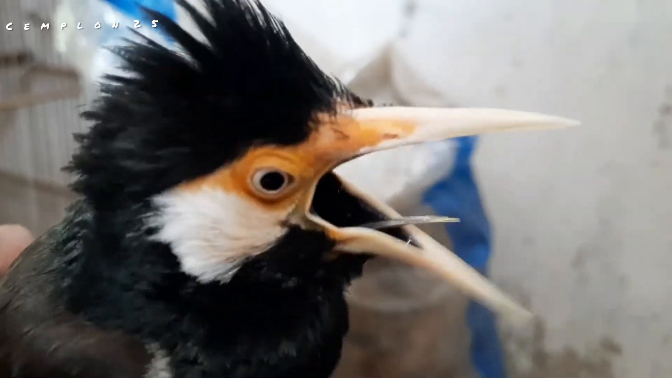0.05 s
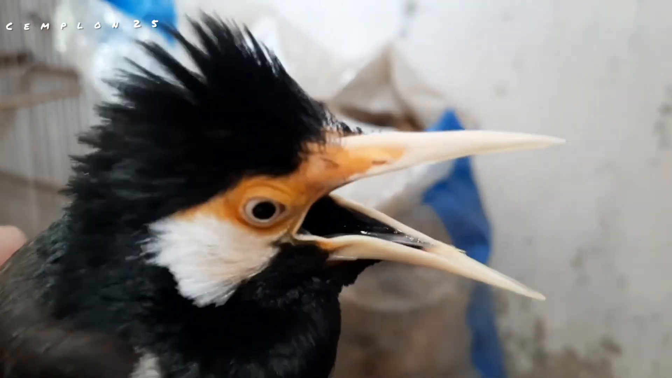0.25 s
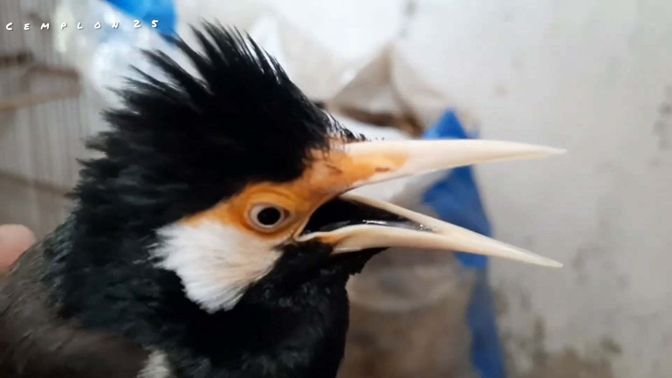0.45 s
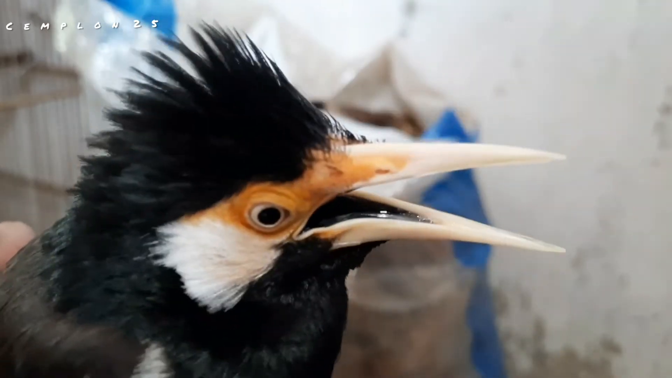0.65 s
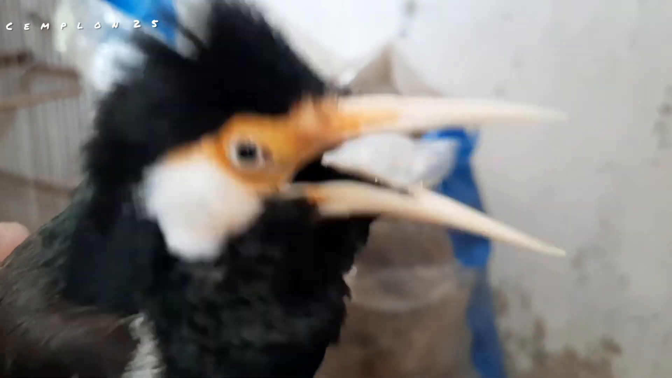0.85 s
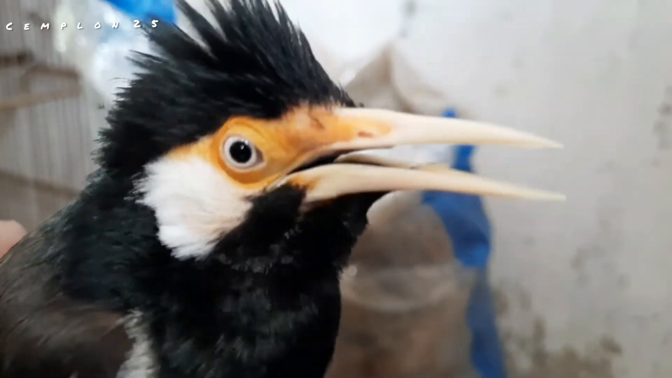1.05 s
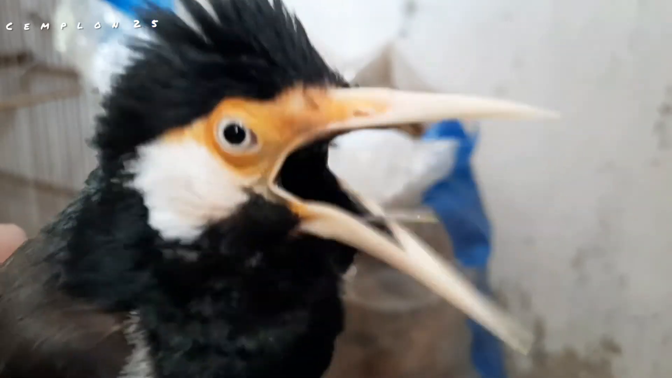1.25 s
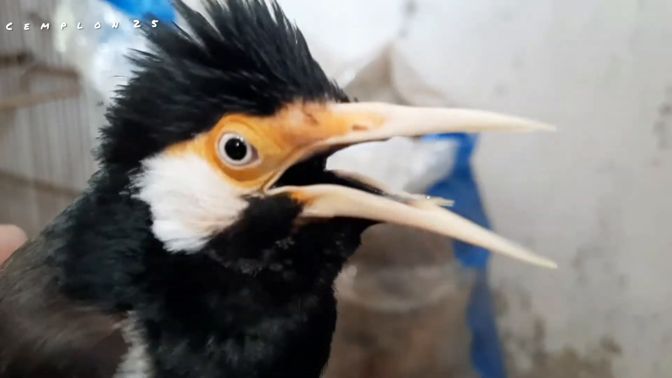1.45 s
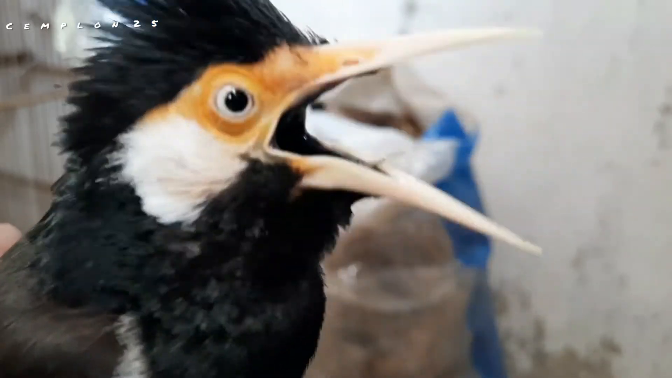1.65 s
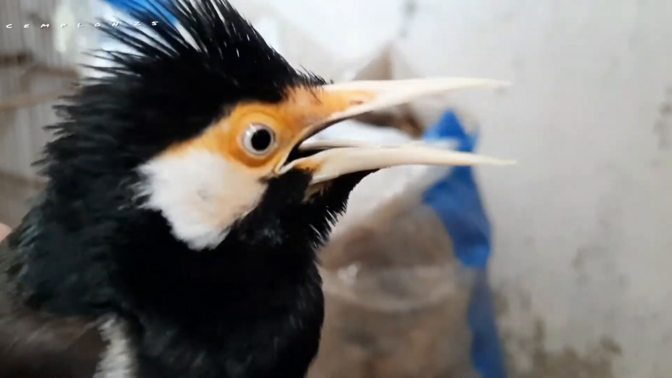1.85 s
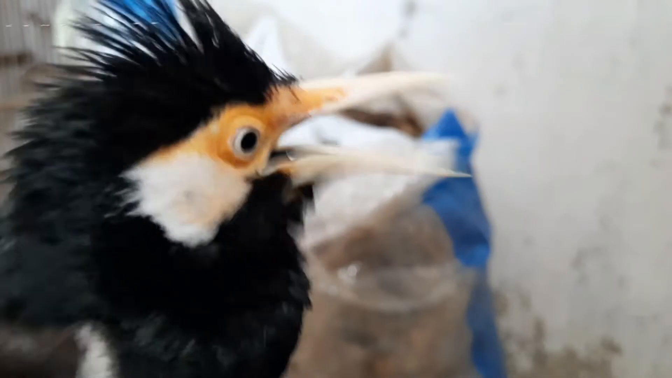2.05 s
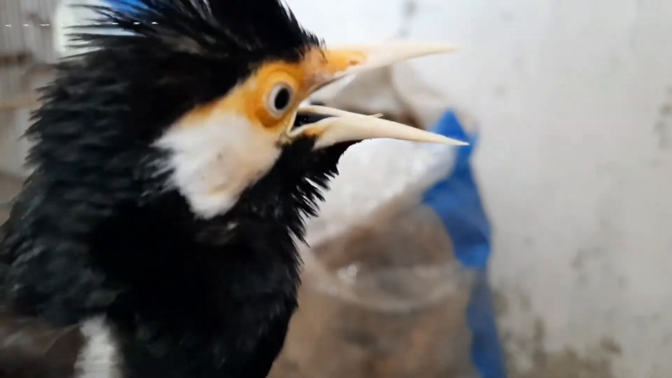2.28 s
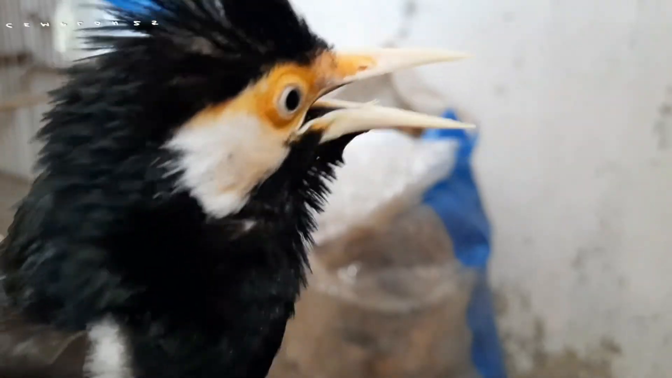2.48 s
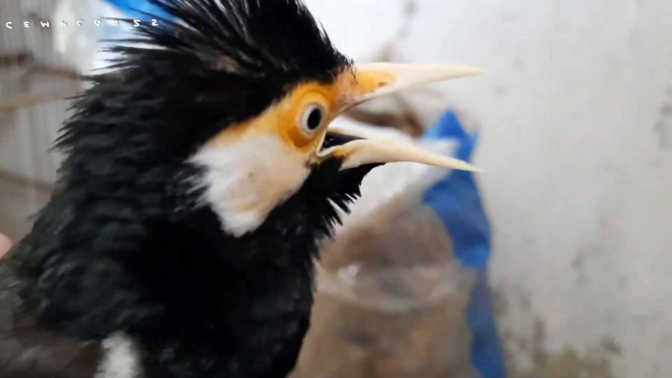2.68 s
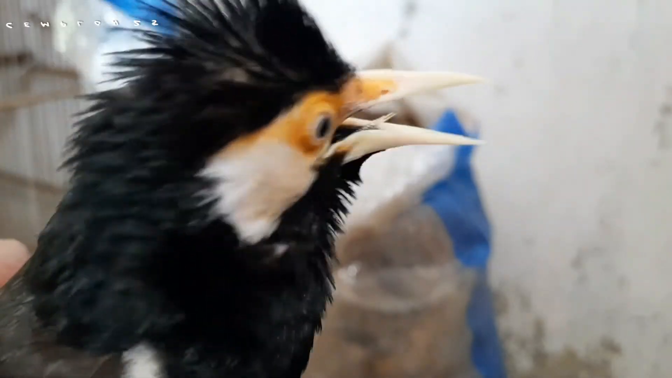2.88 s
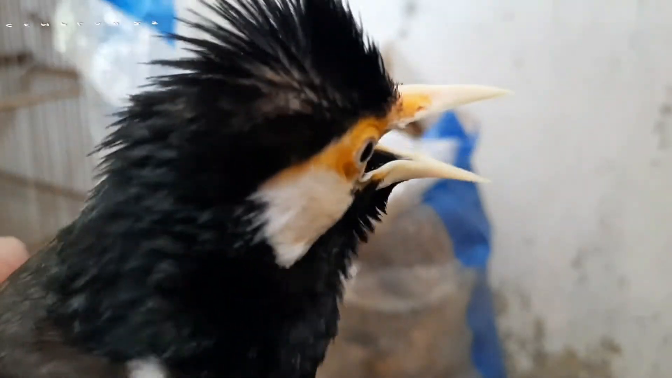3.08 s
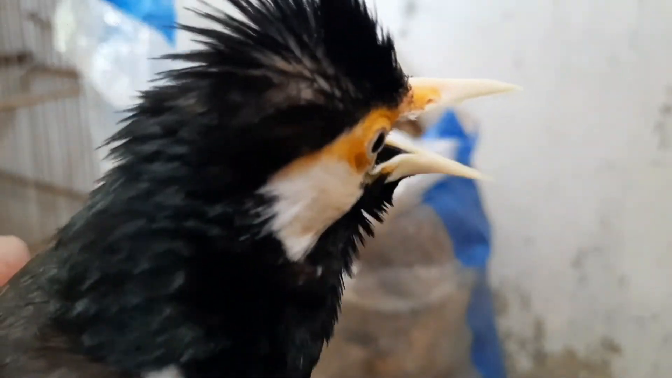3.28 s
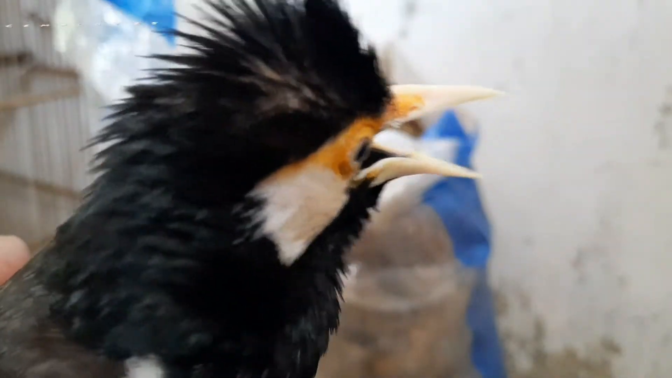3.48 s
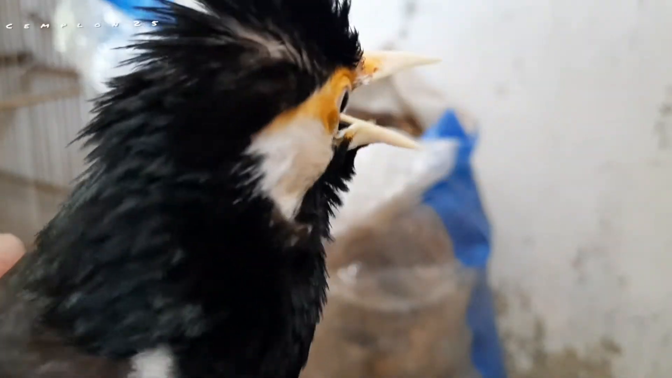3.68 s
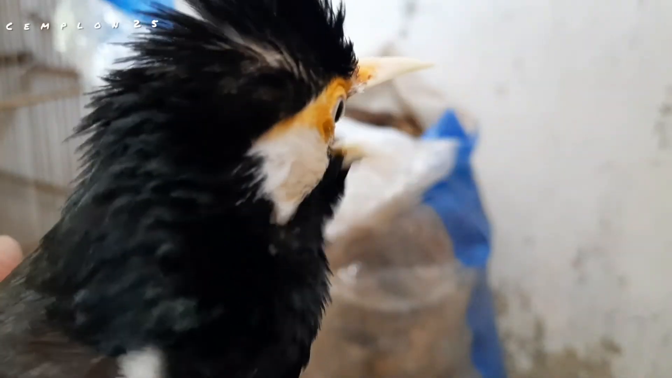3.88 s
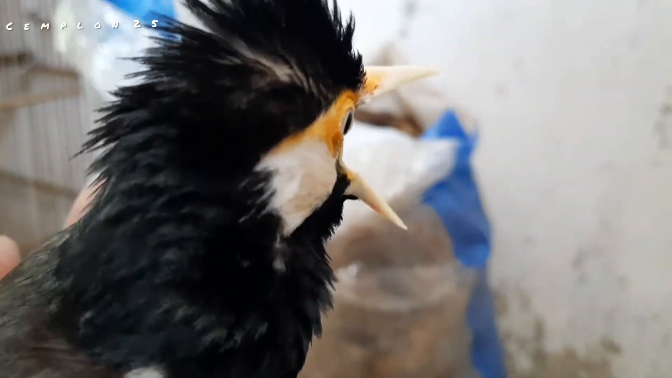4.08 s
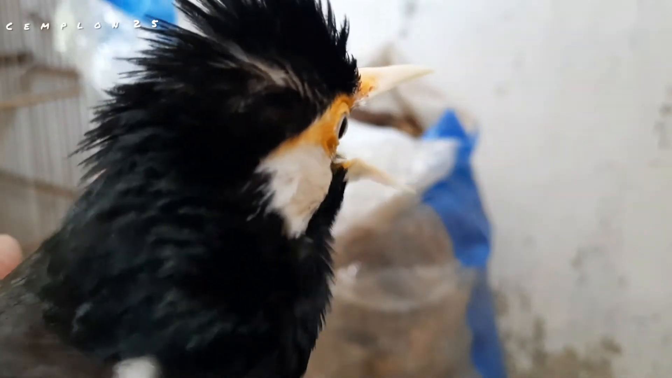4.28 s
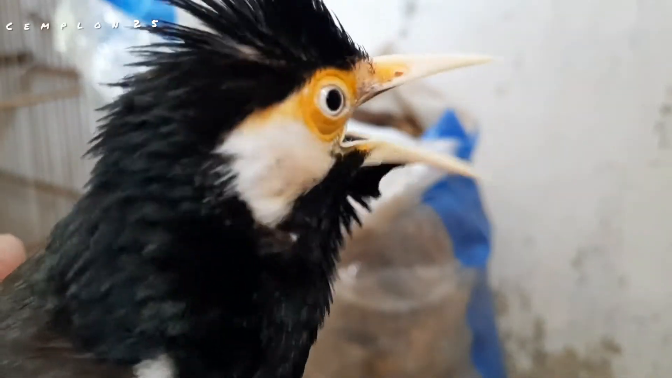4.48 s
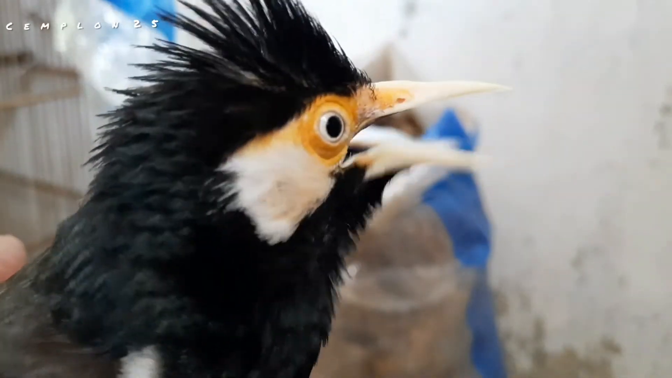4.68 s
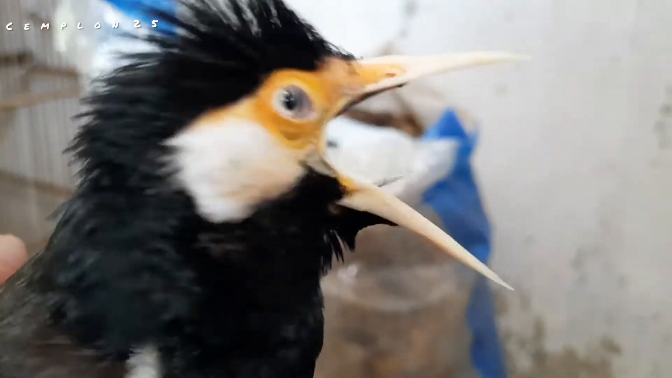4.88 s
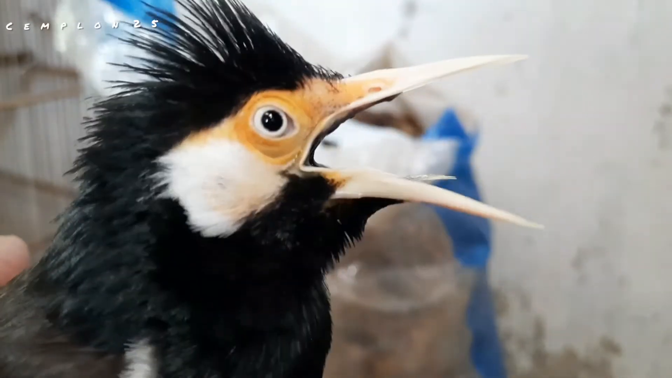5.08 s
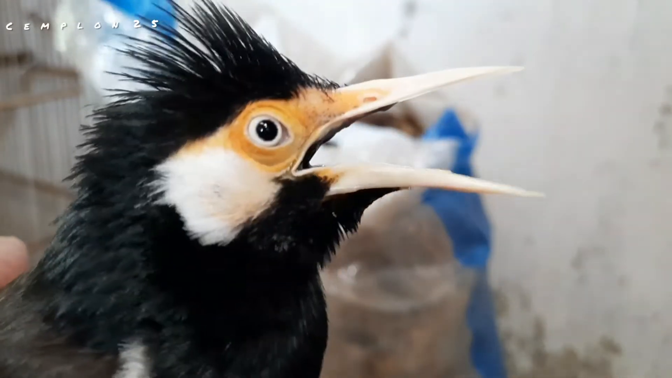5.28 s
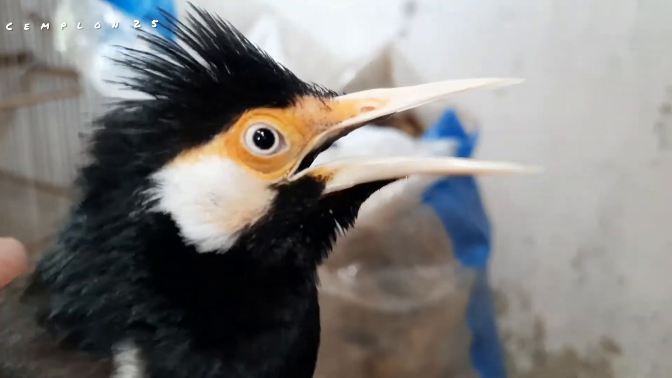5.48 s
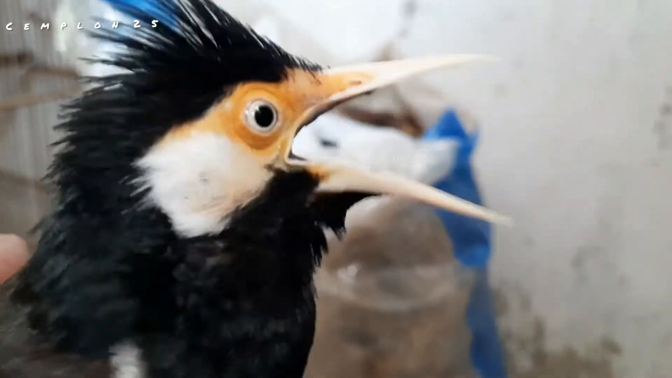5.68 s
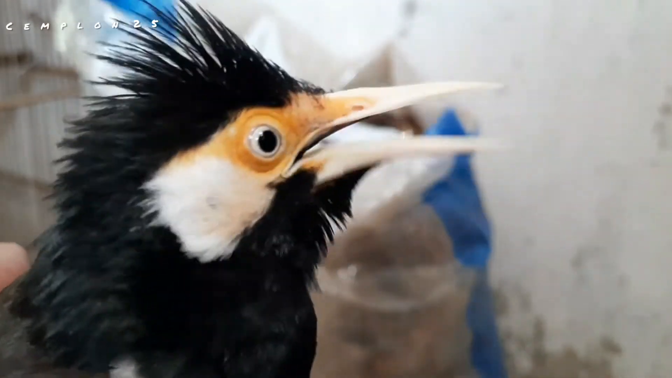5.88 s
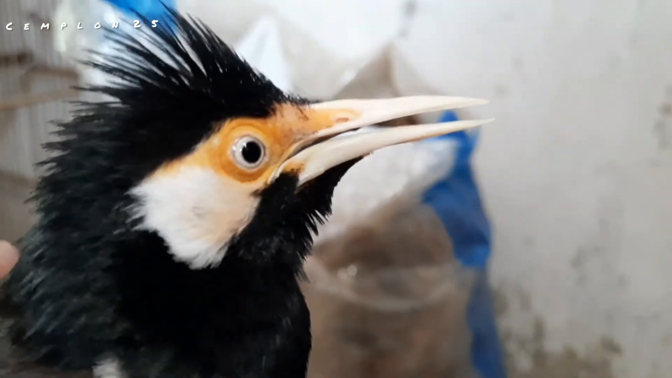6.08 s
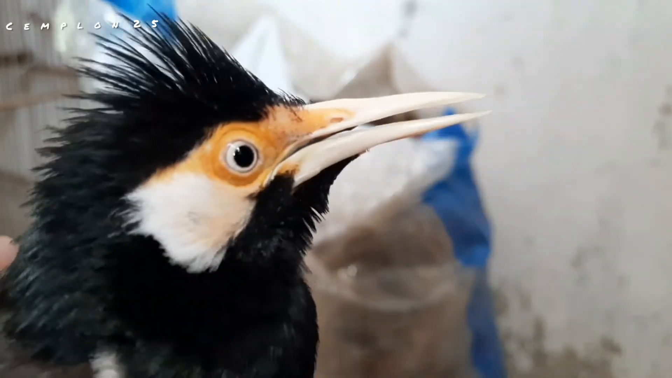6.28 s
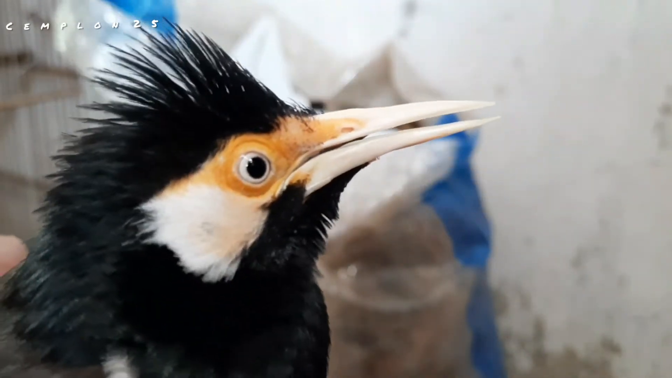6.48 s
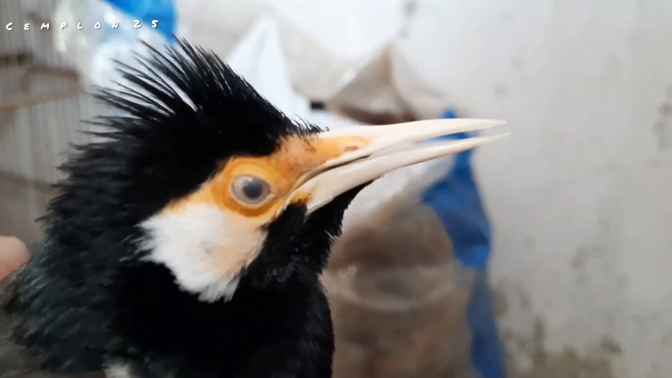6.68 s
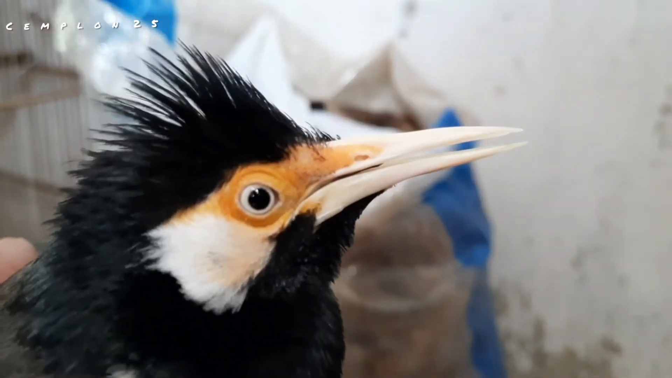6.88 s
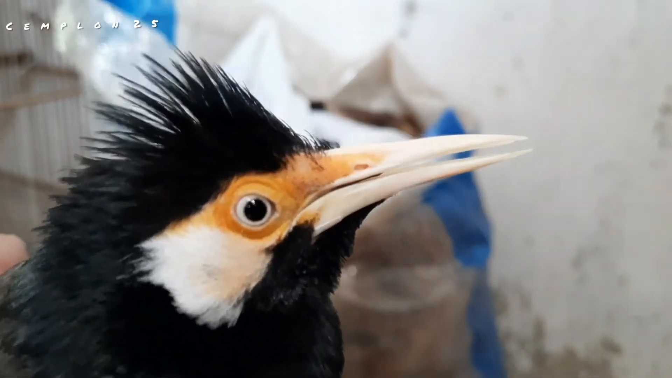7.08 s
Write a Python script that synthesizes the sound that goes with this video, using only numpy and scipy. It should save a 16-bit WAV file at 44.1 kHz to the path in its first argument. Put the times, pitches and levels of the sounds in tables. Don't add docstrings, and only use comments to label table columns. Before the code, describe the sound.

Very close, bright bird song in a small echoing yard: isolated shrill whistles first, then evenly spaced buzzing trills that curl upward, a soft low note and a fast volley of raspy chirps. Fainter caged birds whistle and chatter underneath, mostly in the middle. Song stops, returns for a brief fluttering whistle, then only dry bill snaps, a faint frog-like purr, low traffic and motor hum remain.

```python
import sys
import numpy as np
from scipy import signal
from scipy.fft import rfft, irfft, next_fast_len
from scipy.io import wavfile
from scipy.ndimage import uniform_filter1d, map_coordinates

SR = 44100
rng = np.random.default_rng(int(sys.argv[2]) if len(sys.argv) > 2 else 0)


def elevation(decibels):
    levels = np.asarray(decibels, float)
    return 10 ** (levels / 20)


def unload_audio(sound):
    columns = np.transpose(np.atleast_2d(sound))
    steps = np.round(np.clip(columns, -1, 1) * 32767)
    wavfile.write(sys.argv[1], SR, steps.astype(np.int16))


N = 314874

# frequency in Hz, level in dB.
BEAK = [(1000, -8), (2500, 12.5), (4500, 14.5), (6000, 7.5), (9000, 11), (11500, 8), (14000, 3.5),
        (16000, -2.5)]
# start in seconds, length in seconds, level in dB, first pitch swing in Hz.
TRILLS = [(2.071, 0.17, -13.5, 398), (2.449, 0.17, -10.5, 447.7), (2.856, 0.17, -8.5, 420),
          (3.155, 0.16, -8, 436.6), (3.532, 0.15, -9.5, 440)]
# first rate in Hz, last rate in Hz, start in turns,
# extra loudness at the crest in dB, extra second multiple in dB.
BEAT = [(89.7, 160, 0.22, -2, 9.5), (71.5, 98, 0.3, 0, 8.5), (81.6, 47, 0.017, -1.5, 9.5),
        (74.8, 71, -0.0087, 0, 5), (66, 60, -0.13, -1, 4), (94.9, 80, 0.13, 4, 8.5)]
# start in seconds,
# peak in dB, crack in dB.
SNAPS = [(0.1604, -53.5, -24), (0.4099, -51, -4.5), (0.6586, -43.5, -9), (1.2075, -26, -17.5),
         (2.0578, -19, -22.5), (2.4368, -19, -28), (2.8444, -16.5, -24.5), (3.1463, -17.5, -28),
         (3.5204, -16.5, -30), (6.0253, -27, -8.5), (6.304, -40.5, 3), (7.0699, -31.5, -2.5)]
# start in seconds, hold in seconds, centre in Hz, level in dB,
# gritty edge in dB.
FLOCK = [(.64, 0.2, 3201, -58.5, -68.5), (0.799, 0.23, 3025, -47, -69.5), (1.066, 0.027, 3515, -43.5, -60),
         (1.25, 0.067, 3796, -51.5, -63), (1.49, .07, 3600, -40.5, -60), (1.629, 0.12, 3600, -45.5, -54),
         (1.778, 0.055, 2506, -49, -72), (1.918, .14, 4486, -44.5, -58), (2.071, .16, 4200, -42.5, -59.5),
         (2.248, 0.1, 3680, -36.5, -54.5), (2.374, .14, 3800, -42.5, -55.5),
         (2.727, .1, 3386, -46.5, -54.5), (3.004, 0.068, 2930, -35.5, -52), (3.129, .16, 3798, -40.5, -55),
         (3.296, 0.075, 3213, -37, -52), (3.464, 0.083, 3100, -32.5, -44), (3.676, 0.037, 2800, -34.5, -49),
         (3.66, .19, 4703, -46, -57.5), (3.9, .14, 3993, -43, -46), (4.1, 0.09, 2894, -34.5, -44),
         (4.33, 0.16, 4900, -43, -43.5), (4.501, 0.12, 2984, -40.5, -49.5),
         (4.605, .05, 2992, -36.5, -44.5), (4.719, 0.16, 3298, -34.5, -41.5)]


def unit(x):
    return x / np.sqrt(np.mean(x ** 2) + 1e-20)


def along(points, hz):
    f, v = np.transpose(points)
    return np.interp(np.log(hz + 1), np.log(f + 1), v)


def columns(rows, t):
    s, *cols = np.transpose(rows)
    return [np.interp(t, s, c) for c in cols]


def wobble(rate, size):
    knots = rng.standard_normal(int(size / SR * 400) + 4)
    return map_coordinates(knots, [np.arange(size) * np.clip(rate, 0, 400) / SR])


def filtered(x, response):
    m = next_fast_len(N + SR // 2)
    return irfft(rfft(x, m) * response(np.fft.rfftfreq(m, 1 / SR)), m)[..., :N]


def add(track, s, sound):
    part = track[max(round(s * SR), 0):][:len(sound)]
    part += sound[:len(part)]


def span(rows):
    return np.arange(rows[0][0], rows[-1][0], 1 / SR)


def gust(s, db, rise, fall):
    now = np.arange(N) / SR
    return elevation(db - np.where(now > s, fall, rise) * np.abs(now - s))


def syrinx(hz, db, overtones_db, second_db, third_db, breath_db, jitter, fifth_db=0):
    multiples = [-12, -6, -2.5, -22.5, -9, -4.5, -23, -9.5]
    effort = .45
    extra_db = {2: second_db, 3: third_db, 5: fifth_db}
    n = len(hz)
    phase = 2 * np.pi * np.cumsum(hz * (1 + jitter * wobble(338.4, n))) / SR
    tone = np.sqrt(2) * np.sin(phase)
    pressed_db = overtones_db + effort * (db - db.max() + 4.5)
    for k, level in enumerate(multiples, 2):
        gain = elevation(pressed_db + level + extra_db.get(k, 0) + along(BEAK, k * hz)) * (k * hz < 16000)
        hoarse = 1 + 60 * jitter * wobble(400, n)
        blur = min(100 * jitter, 1) * wobble(300, n)
        tone = tone + gain * hoarse * np.sin(k * phase + blur)
    steps_to_end = np.minimum(np.arange(n), np.arange(n)[::-1])
    edge = np.minimum(1, steps_to_end / (SR / 400))
    return edge * elevation(db) * np.array([tone, elevation(breath_db) * rng.standard_normal(n)])


def swoops():
    # start in seconds, length in seconds, first pitch in Hz, rise in seconds, level in dB.
    swoop_rows = [(1.208, .128, 3988, 0.021, -7.5), (1.537, .166, 2198, .026, -7.5)]
    round_s, fall_s, end_s = 0.0058, 0.04, .012
    top_hz, knee_hz, hold_hz, dip_hz, end_hz = 4361, 3105, 2960, 2850, 2700
    start_db, knee_db, sag_db, end_db = -8.5, 2, -3, -7
    notes = []
    for s, length, first_hz, rise, db in swoop_rows:
        top, end = s + rise, s + length - end_s
        hold = top + 1.3 * fall_s
        dip = hold + 0.61 * (end - hold)
        notes.append([
            (s, first_hz, db + start_db * top_hz / first_hz),
            (top - round_s, top_hz, db),
            (top + round_s, top_hz, db),
            (top + fall_s, knee_hz, db + knee_db),
            (hold, hold_hz, db),
            (dip, dip_hz, db + sag_db),
            (dip + end_s, knee_hz, db),
            (end, knee_hz, db + sag_db),
            (s + length, end_hz, db + end_db)])
    return notes


def whistles():
    # time in seconds, pitch in Hz, level in dB.
    whistle_rows = [
        [(0.0, 4054, -14), (.012, 4207, -10.5), (.022, 4130, -12), (.042, 4280, -8.5), (.058, 4260, -6.5),
         (.062, 4410, -30.5), (.068, 4292, -8), (.114, 4245, -13.5), (.122, 4700, -23)],
        [(0.8, 3444, -42), (0.82, 3542, -16.5), (0.856, 3064, -12), (0.898, 2873, -10), (0.952, 2395, -21.5)],
        [(1.425, 1862, -38.5), (1.435, 2256, -39.5), (1.46, 2527, -36), (1.474, 2963, -38),
         (1.482, 3600, -35.5)],
        [(1.77, 2606, -26), (1.835, 2180, -45.5), (1.9, 2335, -65)],
        [(3.86, 1000, -41), (3.865, 1153, -38.5), (3.869, 1374, -34), (3.91, 1490, -31.5), (4.025, 1515, -29.5),
         (4.09, 1537, -27.5), (4.112, 1478, -45)],
        [(5.616, 2010, -40), (5.624, 2300, -24), (5.632, 2950, -25), (5.638, 2650, -25.5), (5.645, 3080, -24),
         (5.662, 3200, -19.5), (5.679, 3753, -14.5), (5.7, 3600, -16), (5.714, 3500, -35.5)],
        [(5.728, 2600, -24), (5.733, 2644, -16.5), (5.742, 3279, -11), (5.748, 2800, -20.5),
         (5.755, 3295, -10.5), (5.764, 2650, -15), (5.771, 3346, -11.5), (5.787, 3240, -11.5),
         (5.802, 2150, -18.5)],
    ]
    # flutter rate in Hz, flutter depth in dB.
    waver = [(80, 1), (125, 5), (80, 3), (80, 3), (60, .6), (230, 3), (200, 3), (110, 1.5), (130, 1.6)]
    # overtones in dB, extra second multiple in dB, extra third in dB,
    # extra fifth in dB, breath in dB.
    voice = [(-14.5, -2, 3, 0.1, -52.5), (-27, 9, -4.5, 19, -36.5), (-19.5, 21.5, -6, 5, -36),
             (-35, 10, 15, -3, -37.5), (-11, 24, -7.5, 21, -42.5), (-26, 17, 15, 5, -39),
             (-28.5, 13, 4.5, -5, -37.5), (-16, 1, -9, 2, -45.5), (-17.5, 4, -5, -1.5, -39)]
    notes = []
    for rows, (flutter_hz, flutter_db), tint in zip(whistle_rows + swoops(), waver, voice):
        overtones_db, second_db, third_db, fifth_db, breath_db = tint
        hz, db = columns(rows, span(rows))
        dips = -flutter_db * wobble(flutter_hz, len(hz)) ** 2
        sound = syrinx(uniform_filter1d(hz, size=81), db + flutter_db / 2 + dips, overtones_db, second_db,
                       third_db, breath_db, jitter=0.005 * min(flutter_db, 2), fifth_db=fifth_db)
        notes.append((rows[0][0], sound))
    return notes


def trills():
    # share of the length, centre in Hz, level in dB, share of the swing.
    rising = [(0, 2264, -10.5, .9), (.085, 2223, -6, 0.82), (0.499, 2250, -2, .6),
              (0.759, 2332, -0.67, .14), (0.931, 2461, -5, .09), (1, 2423, -17.5, .09)]
    # time in seconds, centre in Hz, level in dB, swing in Hz.
    falling = [(4.288, 2663, -32, 130), (4.298, 2802, -16.5, 109.9), (4.32, 2650, -16, 330.4),
               (4.372, 2342, -13, 377.5), (4.438, 2271, -15, 378.6), (4.503, 2080, -19.5, 326.3),
               (4.51, 2100, -40.5, 245.4)]
    curves = []
    for s, length, level_db, swing in TRILLS:
        curves.append([(s + u * length, hz, level_db + db, share * swing) for u, hz, db, share in rising])
    return curves + [falling]


def trill_notes():
    notes = []
    for rows, (first_hz, last_hz, turns, crest_db, second_db) in zip(trills(), BEAT):
        hz, db, swing = columns(rows, span(rows))
        n = len(hz)
        beats = turns + np.cumsum(np.linspace(first_hz, last_hz, n)) / SR + .075 * wobble(55, n)
        beat = 2 * np.pi * beats
        shape = np.cos(beat) + 0.05 * np.cos(2 * beat)
        db = db + crest_db * shape * swing / 300 + 1.8 * wobble(200, n)
        sound = syrinx(hz + swing * shape, db, overtones_db=-33, second_db=second_db, third_db=5.5,
                       breath_db=-44, jitter=1 / 150)
        notes.append((rows[0][0], sound))
    return notes


def first_pulses():
    notes = []
    for (s, *_), (_, _, level_db, _) in zip(SNAPS[4:], TRILLS):
        fade = np.linspace(0, -6, SR // 140)
        sound = syrinx(2100 + 0 * fade, level_db - 10.5 + fade, overtones_db=-30.0, second_db=7.0,
                       third_db=-1, breath_db=-26, jitter=1 / 16)
        notes.append((s, sound))
    return notes


def rising_chirps():
    # start in seconds, level in dB, start pitch in Hz, top pitch in Hz, stretch in time.
    chirp_rows = [(4.708, -15.5, 1492, 4200, 1.1), (4.75, -7.5, 2700, 3850, 1), (4.794, -8, 2700, 4050, .9),
                  (4.838, -7, 2700, 4200, 1), (4.883, -6.5, 2700, 4200, 1), (4.927, -15, 3265, 4100, .6)]
    # time in seconds, share of the rise, level in dB.
    chirp_shape = [(0, 0, -21), (.007, .5, -10), (.01, .62, 0), (.017, 1, -4), (.021, .85, -8.5),
                   (.024, .9, -5), (.028, .8, -19)]
    notes = []
    for s, level_db, start_hz, top_hz, stretch in chirp_rows:
        t = np.arange(0, stretch * chirp_shape[-1][0], 1 / SR) / stretch
        rise, db = columns(chirp_shape, t)
        db = level_db - 2 + db + 1.3 * wobble(400, len(db))
        sound = syrinx(start_hz + rise * (top_hz - start_hz), db, overtones_db=-20.0, second_db=4.5,
                       third_db=0.5, breath_db=-19, jitter=1 / 28)
        notes.append((s, sound))
    return notes


def song():
    tone, breath = np.zeros(N), np.zeros(N)
    for s, (voiced, airy) in whistles() + trill_notes() + first_pulses() + rising_chirps():
        add(tone, s, voiced)
        add(breath, s, airy)
    return tone + filtered(breath, lambda hz: elevation(along(BEAK, hz)) * hz ** 2 / (hz ** 2 + 1500 ** 2))


def rattle(count=9):
    start_s, rate_hz, level_db, grows_db, t60_s = .582, 36.4, -66.5, 3, 0.1
    throat = [(2650, 1100, -3.5), (4800, 4260, 0)]
    track, t = np.zeros(N), np.arange(SR // 25) / SR
    for k in range(count):
        puff = elevation(-60 * t / t60_s) * np.minimum(t / .002, 1) * rng.standard_normal(len(t))
        for first_hz, last_hz, db in throat:
            hz = first_hz + (last_hz - first_hz) * k / count
            sos = signal.butter(2, [.88 * hz, 1.12 * hz], "band", fs=SR, output="sos")
            band = unit(signal.sosfilt(sos, puff))
            add(track, start_s + k / rate_hz, elevation(level_db + db + grows_db * min(k, count / 2)) * band)
    return track


def snaps():
    # ringing frequency in Hz, level in dB, time to die by 60 dB in seconds.
    ringing = [(2600, 3.5, 0.0084), (3600, 12.5, 0.0011), (7100, -1, 0.005), (11400, -2.5, 0.0014)]
    track, t = np.zeros(N), np.arange(SR // 20) / SR
    for s, db, crack_db in SNAPS:
        clap = elevation(crack_db - 60 * t / 0.01) * rng.standard_normal(len(t))
        for i, (hz, level, t60) in enumerate(ringing):
            change_db = rng.normal(0, 2.4) if i < 2 else crack_db + 6.0
            clap += elevation(level + change_db - 60 * t / t60) * np.sin(2 * np.pi * hz * t)
        add(track, s, elevation(db) * clap)
    return signal.sosfilt(signal.butter(3, 2200, "high", fs=SR, output="sos"), track)


def chest():
    # frequency in Hz, level in dB per Hz.
    dull = [(120, -28.5), (300, -3), (900, -1.5), (1400, -4.5), (2000, -61)]
    pushes = [(.9, -68), (1.26, -67), (1.58, -67), (2.05, -62), (2.43, -59), (2.84, -57.5), (3.14, -61),
              (3.51, -62.5), (3.855, -60), (4.31, -64.5), (4.7, -60.5), (5.3, -71.5), (5.63, -61),
              (5.79, -74.5)]
    push = sum(gust(s, db, rise=599.5, fall=58.5) for s, db in pushes)
    air = rng.standard_normal(N) + rng.standard_normal((2, N))
    air = unit(filtered(air, lambda hz: elevation(along(dull, hz))))
    return push * elevation([[1.5], [-1.5]]) * elevation(3 * wobble(60, N)) * air


def puffs():
    puff_rows = [(.08, -42.5), (4.815, -52), (4.86, -50), (4.908, -44.5), (5.69, -48), (6.03, -51.5),
                 (6.308, -63), (7.08, -48)]
    thud = [(20, -10), (60, 1.5), (170, -18.5), (350, -3), (700, -28.5), (1500, -90)]
    half_width_s = 0.016
    now = np.arange(N) / SR
    air = unit(filtered(rng.standard_normal((2, N)), lambda hz: elevation(along(thud, hz))))
    return air * sum(elevation(db) * np.exp(-((now - s) / half_width_s) ** 2 / 2) for s, db in puff_rows)


def neighbour():
    # start in seconds, end in seconds, first pitch in Hz, last pitch in Hz,
    # level in dB.
    clear = [(1.08, 1.14, 4340, 3797, -55), (1.125, 1.2, 3246, 3100, -57), (1.29, 1.411, 1818, 1600, -55.5),
             (1.479, 1.536, 3924, 3490, -37.5), (1.52, 1.545, 3813, 4500, -40.5),
             (2.2, 2.235, 4800, 4780, -52), (2.238, 2.272, 2435, 2427, -37), (2.28, 2.35, 2440, 3026, -39),
             (2.357, 2.43, 3430, 3426, -37.5), (3.445, 3.5, 2650, 2600, -37.5),
             (3.45, 3.49, 3250, 3300, -36.5), (2.785, 2.82, 2250, 2150, -48),
             (2.815, 2.885, 3086, 3112, -38.5), (3.038, 3.13, 3346, 3367, -42),
             (3.487, 3.503, 3700, 4600, -33), (3.52, 3.578, 4090, 3885, -31.5),
             (3.7, 3.745, 2950, 3464, -33.5), (3.885, 3.906, 4080, 4040, -36.5),
             (3.92, 3.965, 4265, 3900, -32), (4.07, 4.13, 2724, 2650, -36.5),
             (4.1, 4.124, 3373, 3288, -27.5), (4.14, 4.19, 2765, 2600, -31.5),
             (4.175, 4.24, 2292, 2138, -39), (4.19, 4.256, 3480, 3473, -34.5),
             (4.515, 4.578, 3294, 3380, -34), (4.52, 4.585, 2717, 2822, -35),
             (4.582, 4.605, 3414, 3360, -32), (4.618, 4.675, 2793, 2850, -30),
             (4.63, 4.7, 3416, 3153, -36.5), (6.04, 6.135, 678, 632, -83), (6.88, 6.95, 5340, 5130, -87)]
    croaks = [(1.724, 1.74, 4290, 5200, -46), (1.765, 1.785, 4210, 5300, -44),
              (2.72, 2.76, 1840, 1900, -59), (4.55, 4.68, 840, 1050, -74), (5.06, 5.23, 804, 800, -86),
              (5.28, 5.36, 400, 380, -79.5), (3.77, 3.83, 740, 759, -68), (1.82, 1.9, 1800, 1100, -63.5),
              (3.74, 3.87, 1890, 1750, -53.5), (3.87, 4.07, 2000, 1950, -53),
              (3.93, 3.99, 3600, 3500, -35.5), (4.11, 4.26, 809, 750, -70)]
    squeaks = [(2.28, 2.31, 3990, 4570, -45), (2.3, 2.36, 4530, 4600, -50),
               (2.722, 2.76, 3455, 4044, -43.5), (2.75, 2.82, 4034, 4040, -47)]
    distant = (6.688, 7.5, 3602, 3500, -93.5)
    track = np.zeros(N)
    # notes, jitter, overtones in dB.
    kinds = [(clear, .015, -30), (croaks, .07, -40), (squeaks, .025, -12), ([distant], .05, -1)]
    for notes, jitter, overtones_db in kinds:
        for start, end, first_hz, last_hz, db in notes:
            n = round((end - start) * SR)
            swell = db - 10 * np.linspace(-1, 1, n) ** 4 + 3 * wobble(110, n)
            voiced, _ = syrinx(np.linspace(first_hz, last_hz, n), swell, overtones_db, second_db=8,
                               third_db=0, breath_db=-40, jitter=jitter)
            add(track, start, voiced)
    return track


def bouts(t):
    rise_db_per_s, fall_db_per_s = 1497, 255
    s, hold, hz, db, grit_db = np.transpose(FLOCK)[..., None]
    before, after = np.maximum(s - t, 0), np.maximum(t - s - hold, 0)
    shape = elevation(-rise_db_per_s * before - fall_db_per_s * after)
    power = (elevation(db) * shape) ** 2 + 1e-30
    total = power.sum(0)
    return power.cumsum(0) / total, np.sqrt(total), np.linalg.norm(elevation(grit_db) * shape, axis=0)


def rasp():
    under_trill_db, pulse_db = -33, 9
    track = np.zeros(N)
    for rows, (first_hz, last_hz, turns, *_) in zip(trills(), BEAT):
        _, db, swing = columns(rows, span(rows))
        beat = 2 * np.pi * (turns + np.cumsum(np.linspace(first_hz, last_hz, len(db))) / SR)
        pulse = pulse_db * np.cos(beat) * swing / swing.max()
        add(track, rows[0][0], elevation(under_trill_db + db + pulse))
    return track


def patchy(x, depth_db):
    z = signal.stft(x, nperseg=256)[2]
    field = uniform_filter1d(rng.standard_normal(z.shape), size=4, axis=0)
    field = uniform_filter1d(field, size=24, axis=1)
    return signal.istft(z * elevation(depth_db * unit(field)), nperseg=256)[1][:N]


def flock(count=3000):
    # frequency in Hz, level in dB per Hz.
    grit_colour = [(3300, -36), (4500, -1), (5800, -12), (7200, -7), (9000, -14), (10800, -5), (12000, -11),
                   (13600, -2), (16000, -6)]
    track, t = np.zeros(N), np.arange(SR // 50) / SR
    when, pitch, spread, fall, life, size, who = rng.random((count, 7)).T
    when = FLOCK[0][0] + when * (FLOCK[-1][0] - FLOCK[0][0] + .3) - .04
    shares = bouts(when)[0]
    caller = np.minimum((shares < who).sum(0), len(FLOCK) - 1)
    hz = np.transpose(FLOCK)[2][caller] * np.exp(.3 * (pitch + spread - 1))
    life = (.002 + .016 * life ** 4)[:, None]  # seconds, mostly very short
    phase = 2 * np.pi * hz[:, None] * (t - (0.27 * fall[:, None] - .1) * t ** 2 / life / 2)
    swell = np.sin(np.pi * np.minimum(t / life, 1)) ** 2
    tiny_chirps = swell * (np.sin(phase) + 0.089 * np.sin(2 * phase))
    for s, chirp, db in zip(when, tiny_chirps, 8 * size):
        add(track, s, elevation(db) * chirp)
    track = filtered(track, lambda f: 1 / (1 + (1800 / (f + 1)) ** 6))
    loud = np.sqrt(np.abs(uniform_filter1d(track ** 2, size=SR // 16)) + 1e-3)
    noise = patchy(rng.standard_normal(N), depth_db=7)
    grit = filtered(noise, lambda f: elevation(along(grit_colour, f)))
    high = filtered(grit, lambda f: f > 5800)
    step = np.arange(0, N, 32) / SR
    strength, edge = (np.interp(np.arange(N) / SR, step, v) for v in bouts(step)[1:])
    return (loud > .04) * (track / loud * strength + grit / np.std(high) * (edge + rasp()))


def purr(rate_hz=36.4):
    # time in seconds, level in dB.
    purr_rows = [
        [(.85, -68.5), (1.1, -66), (1.4, -61.5), (1.62, -69)],
        [(2.13, -61.5), (2.2, -67), (2.37, -77)],
        [(3.1, -70.5), (3.3, -64.5), (3.5, -61)],
        [(5.25, -76), (5.45, -65.5), (5.6, -62), (5.8, -71)],
        [(7.005, -70.5), (7.14, -57)],
    ]
    track, t = np.zeros(N), np.arange(SR // 20) / SR
    for rows in purr_rows:
        for s in np.arange(rows[0][0], rows[-1][0], 1 / rate_hz):
            turn = 2 * np.pi * t * rng.normal(1, .025)
            sac = t * elevation(-60 * t / .012) * (np.sin(1250 * turn) + .25 * np.sin(1740 * turn))
            sac += .2 * t * elevation(-60 * t / .006) * np.sin(2750 * turn)
            level = elevation(columns(rows, s)[0] + rng.normal(0, 2))
            add(track, s + rng.normal(0, .001), level * unit(sac))
    return track


def yard():
    levels = [(0.0, -45.5, -52.5), (0.26, -68, -65.5), (0.59, -63, -62.5), (0.97, -59, -49.5),
              (1.79, -58, -56), (2.28, -68, -62), (2.94, -69, -61.5), (4.04, -77, -84),
              (5.47, -74.5, -72.5), (5.8, -65.5, -66.5), (6.74, -74.5, -88), (7.14, -60, -70.5)]
    rumble_colour = [(15, -58), (25, -30), (62, 6.5), (130, -2), (181, -17.5), (210, -22), (355, -14.5),
                     (438, -35), (900, -48.5), (1170, -95), (1980, -120)]
    motor_lines = [(223, 7.2, -3), (308, 23, -6), (335, 18, -8), (390, 24, -16.5)]
    air_colour = [(350, -42.5), (600, -21), (846, -26), (1390, -30.5), (2950, -31), (4160, -25),
                  (6370, -39), (8390, -31.5), (16000, -35)]
    # time in seconds, level in dB, rise in dB per second, fall in dB per second.
    stirs = [(.66, -71, 199.5, 29), (5.27, -78, 400, 3.5), (5.62, -71, 900, 41), (6.03, -77.5, 195, 56),
             (6.305, -76, 58.5, 95), (7.06, -71, 150, -2)]
    air_db, air_waver_db, hum_db, motor_tone_db = -83, 1.5, -3.5, 1

    def noise(share):
        own = rng.standard_normal((2, N))
        return np.sqrt(share) * rng.standard_normal(N) + np.sqrt(1 - share) * own

    def lines(f):
        return sum(elevation(db) * w / (w + 2j * (f - c)) / np.sqrt(w) for c, w, db in motor_lines)

    rumble_db, motor_db = columns(levels, np.arange(N) / SR)
    rumble = unit(filtered(noise(1.0), lambda hz: elevation(along(rumble_colour, hz))))
    hum = unit(filtered(noise(0.66), lines))
    tone = np.sin(2 * np.pi * np.cumsum(87 + 0.61 * wobble(0.92, N)) / SR)
    air = unit(filtered(noise(0.82), lambda hz: elevation(along(air_colour, hz))))
    low = elevation(rumble_db + 4.5 + 1.8 * wobble(2.5, N)) * rumble
    low = low + elevation(motor_db + hum_db) * hum + elevation(motor_db + motor_tone_db) * tone
    stir = elevation(air_db) + sum(gust(*row) for row in stirs)
    return elevation([[1.5], [-2]]) * low + stir * elevation(air_waver_db * wobble(6, N)) * air


def ports(x):
    near_echoes = [(.0021, -13), (.0047, -12), (.0083, -16), (.0128, -18), (.019, -20)]
    left_lead = [(0, 0), (2150, 1.7), (4300, 5.2), (8000, 8.6), (10300, 10.2), (12300, 14), (16500, 16.4)]
    left_louder = [(700, -8), (1300, 16), (2400, 2.5), (4400, 3), (8000, 3), (15000, 3.5)]
    head_turns = [(0.0, -3.5), (0.61, 1), (0.89, 4), (1.87, 1.4), (2.2, 1.5), (5.13, -1.15), (5.89, -1.5),
                  (6.76, 3), (6.84, 0), (7.14, -2.5)]
    side = np.array([[.5], [-.5]])

    def response(hz):
        echoes = 1 + sum(elevation(db) * np.exp(-2j * np.pi * hz * s * (1 + 0.1014 * side))
                         for s, db in near_echoes)
        lead = np.exp(1j * side * np.interp(hz, *np.transpose(left_lead)))
        return elevation(side * along(left_louder, hz)) * lead * echoes

    return filtered(x, response) * elevation((side - 1.5) * columns(head_turns, np.arange(N) / SR)[0])


def walls(x):
    dying = [(500, 0.54), (1300, 0.31), (2500, 0.32), (4000, 0.27), (6500, 0.36), (14000, 0.081)]
    hz, t, z = signal.stft(rng.standard_normal((2, SR // 2)), SR, nperseg=256)
    tail = signal.istft(z * elevation(-60 * t / along(dying, hz)[:, None]), SR, nperseg=256)[1]
    late = np.pad(x, (300, 0))[None]
    return signal.fftconvolve(late, tail / np.linalg.norm(tail[0]), axes=1)[:, :N]


def scene():
    bird, bill, far, low = song() + rattle(), snaps(), flock() + neighbour(), purr()
    direct = ports(bird + bill + elevation(7.0) * far + low)
    echoed = walls(elevation(-18.5) * bird + elevation(-10.0) * bill + elevation(0.5) * far + elevation(3.5) * low)
    return chest() + direct + echoed + yard() + puffs()


def low_pass(x):
    return signal.sosfilt(signal.butter(12, 16880, fs=SR, output="sos"), x)


def record(dry):
    leak_db, leak_top_hz, top_hz = -31, 200, 16800

    def bass(hz):
        return hz ** 2 / (hz ** 2 + 40 ** 2) / (1 + (hz / leak_top_hz) ** 2)

    rounded = dry / (1 + np.abs(dry / .94) ** 10) ** (1 / 10)
    leak = elevation(leak_db) * filtered(np.tanh(3 * rounded ** 2) / 3, bass)
    mix = filtered(rounded + leak, lambda hz: hz < top_hz)
    return low_pass(mix)


dry = scene()
out = record(dry)
unload_audio(out)
```